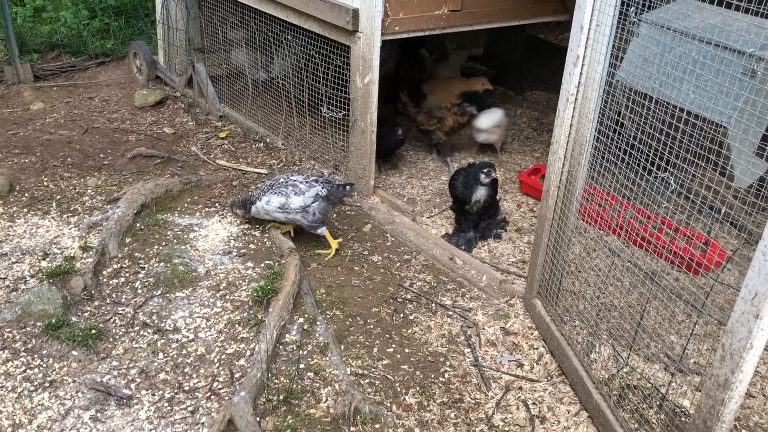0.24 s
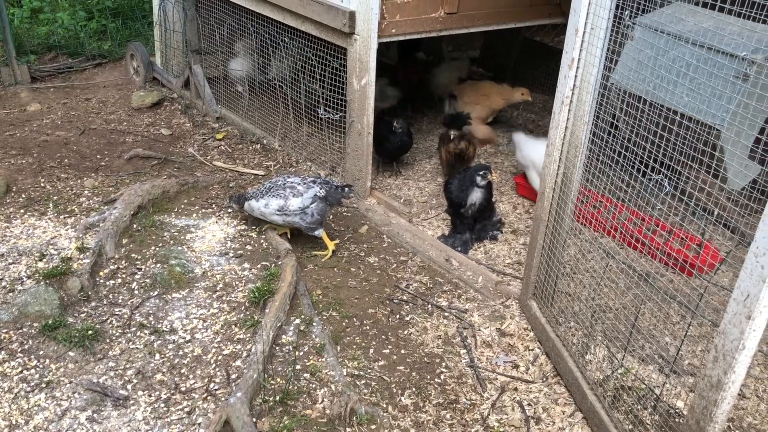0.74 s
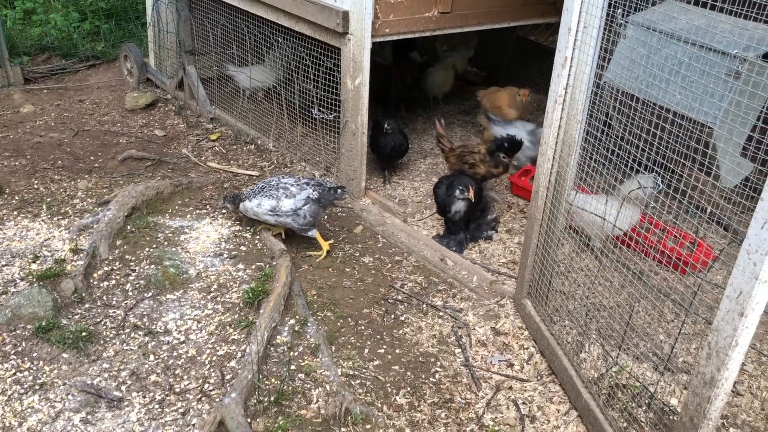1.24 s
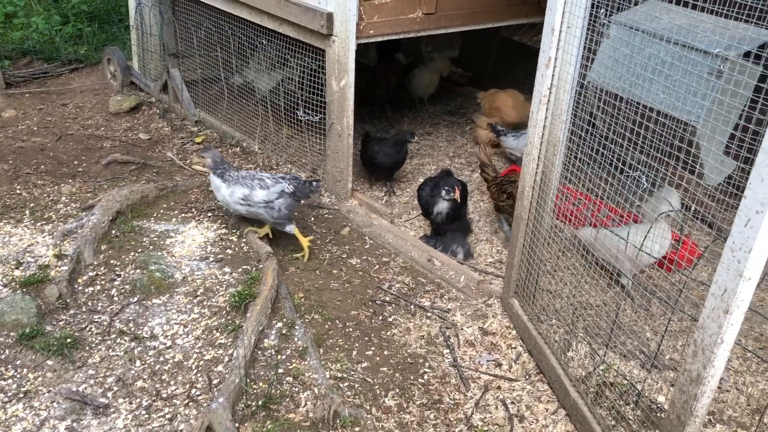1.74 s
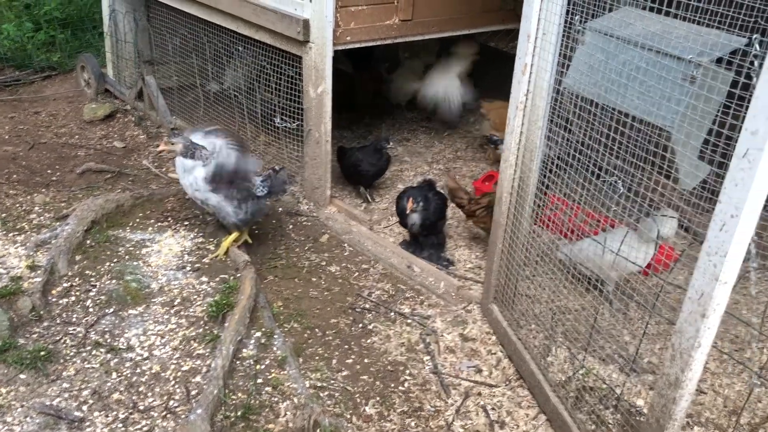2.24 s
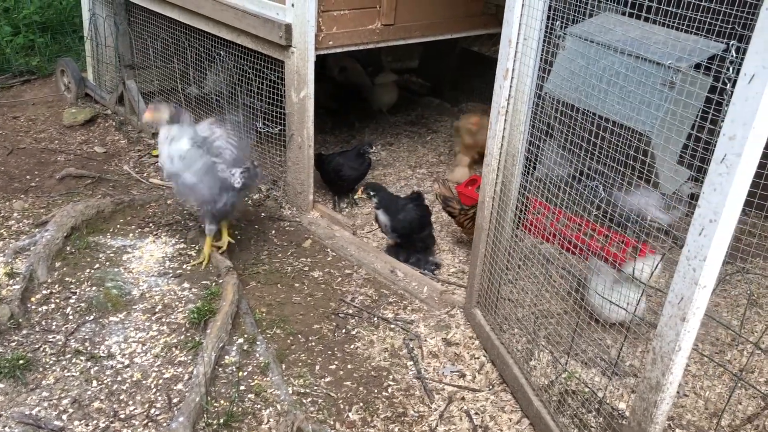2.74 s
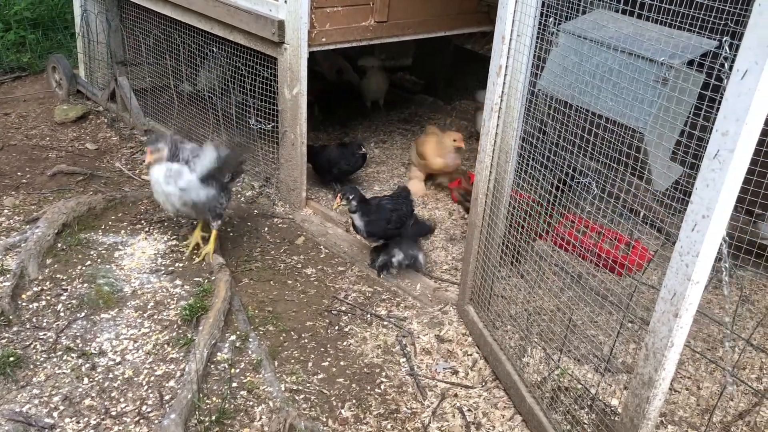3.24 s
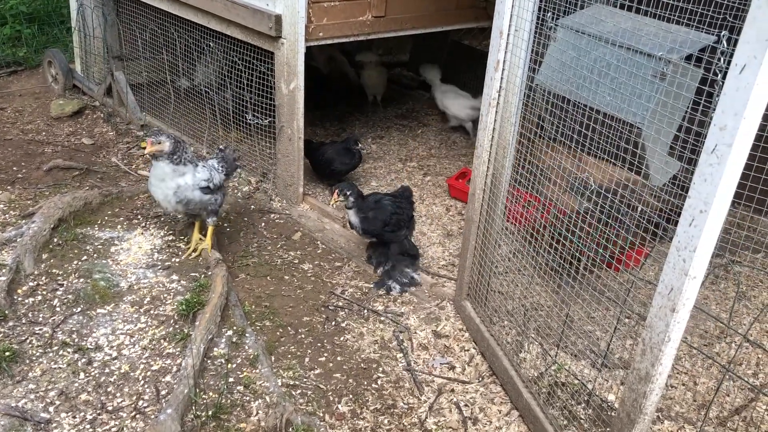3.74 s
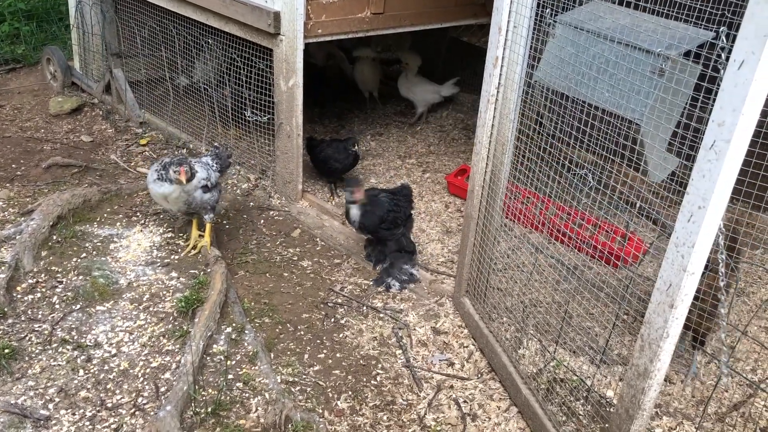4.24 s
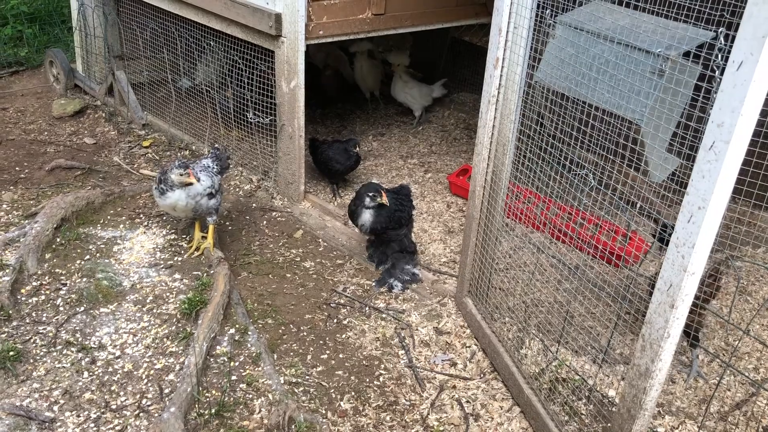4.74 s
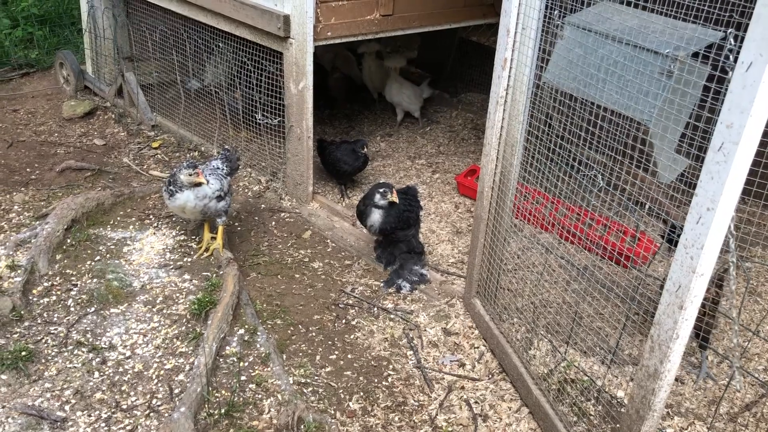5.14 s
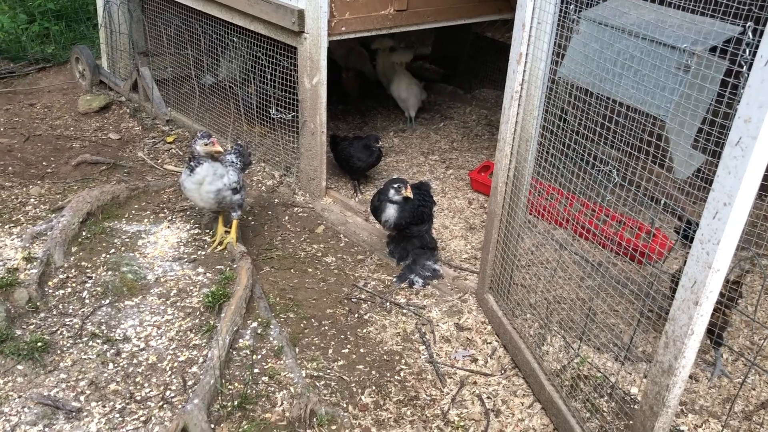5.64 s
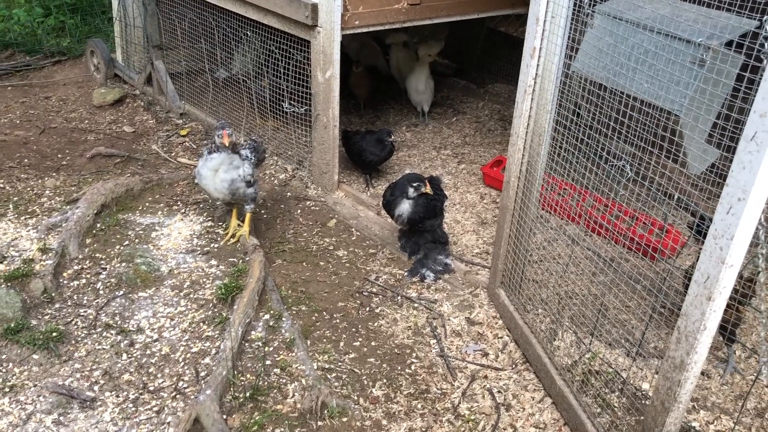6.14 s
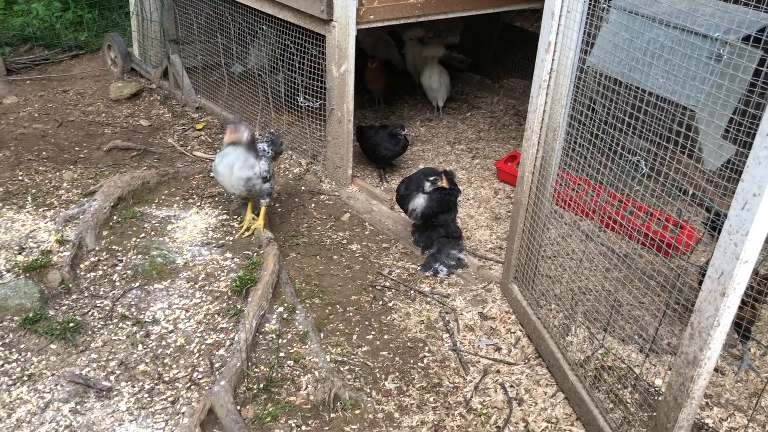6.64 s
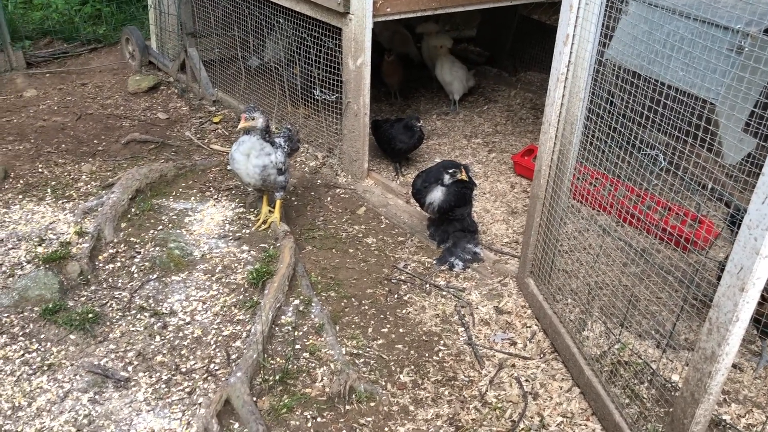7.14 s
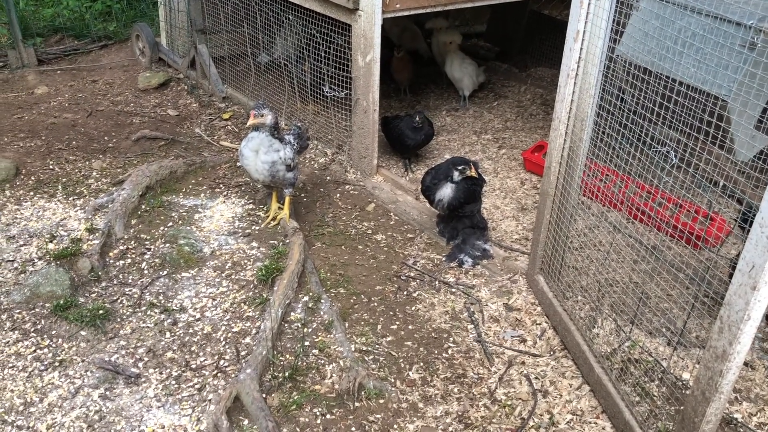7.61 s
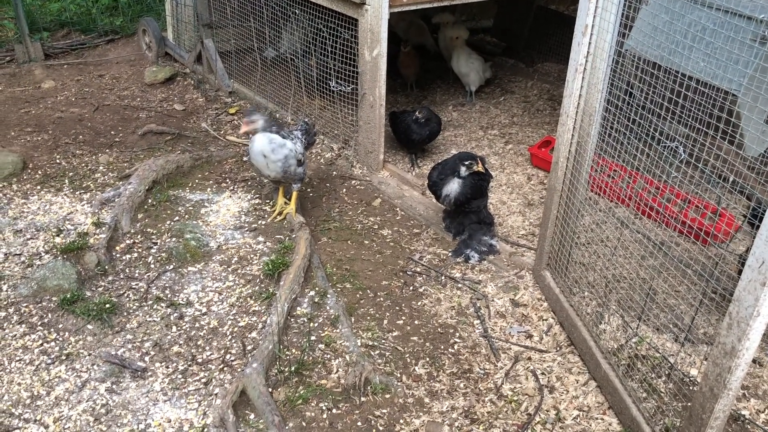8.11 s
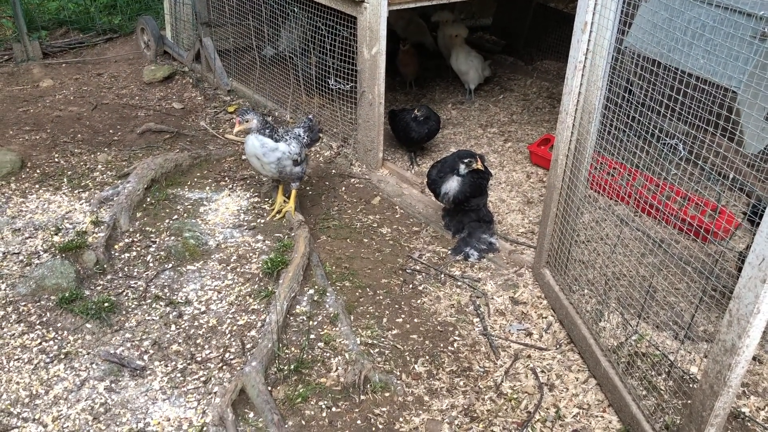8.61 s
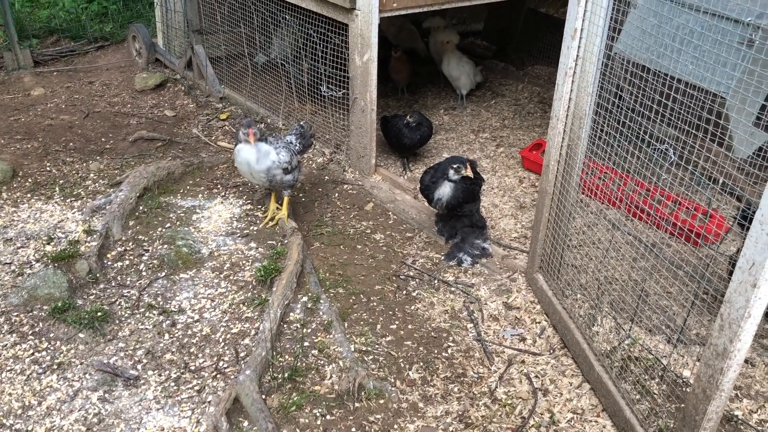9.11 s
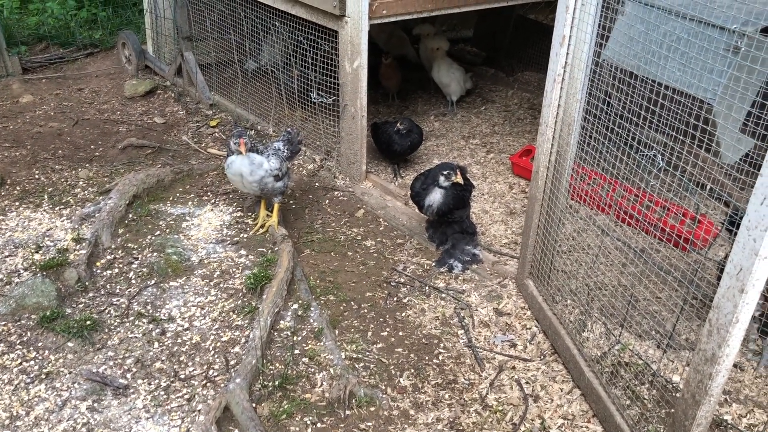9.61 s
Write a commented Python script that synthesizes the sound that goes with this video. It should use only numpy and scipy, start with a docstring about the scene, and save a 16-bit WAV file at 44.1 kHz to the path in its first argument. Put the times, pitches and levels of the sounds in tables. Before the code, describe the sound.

Outdoors beside a small wooden coop, a steady soft airy hush lies under bright chick peeps. They start in a rapid cluster, pause, then one bird hops with fluttering wings, a dry knock and a scrape through chips. Others scurry with light rustles and snaps while peeps grow busy and occasionally crack low. Later the peeping spaces out and softens. Mono microphone a short distance away, with faint wild bird calls.

```python
"""Peeps in quick runs are heard first, from young chickens at the open door of a wooden coop, over a soft hush.
Each peep is a frequency-modulated whistle that mostly scoops up and falls; rough ones flutter and beat.
Now and then a voice breaks down to a low, reedy note, a harmonic tone with lines at half its pitch.
One bird hops with a knock and a skid, made of filtered clicks and decaying board modes; wings are noise puffs.
Feet patter as the others scurry off; short echoes return from the coop and thin calls come from far wild birds."""
import sys
import numpy as np
from scipy import signal
from scipy.fft import rfft, irfft, next_fast_len
from scipy.io import wavfile
from scipy.ndimage import map_coordinates

SR = 44100
rng = np.random.default_rng(int(sys.argv[2]) if len(sys.argv) > 2 else 0)


def transcribe(u):
    """Save the signal u as a 16-bit wav file named by the first command-line argument.

    u: samples, shape (n,) or (channels, n), limited to [-1, 1]; the rate is SR.
    q: integer samples, one column per channel.
    """
    v = np.clip(np.atleast_2d(u).T, -1, 1)
    q = np.round(v * 32767).astype(np.int16)
    wavfile.write(sys.argv[1], SR, q)


N = 435265
T = np.arange(N) / SR

# spectrum of the outdoor hush: (frequency [Hz], density [dB/Hz])
AIR_SPECTRUM = [(15, -74), (25, -46), (75, -8), (129, -3), (227, -4.5), (289, -5.5), (340, -6), (410, -5.5),
                (523, -5), (997, -1.5), (3090, -10), (3340, -11), (15500, -43)]
# thin calls of wild birds far off: (time [s], length [s], pitch [Hz], level [dB])
FAR_CALLS = [(0.42, 0.17, 4800, -66.5), (2.661, 0.051, 5620, -58), (8.13, .15, 7020, -77),
             (9.655, 0.2, 3280, -63)]
# how busily the flock stirs the litter: (time [s], level [dB])
BUSTLE = [(0, -74), (1.1, -74.5), (1.4, -60.5), (1.8, -89), (2.2, -61), (2.8, -61.5), (3.3, -67.5),
          (4.4, -64), (4.8, -79.5), (9.87, -88)]
# spectrum of chips ground under a skidding foot: (frequency [Hz], density [dB/Hz])
SKID_SPECTRUM = [(59, -55), (100, -25), (184, -30), (209, -25), (281, -17), (614, -5.5), (727, -7),
                 (1040, -5), (1620, -5), (2320, -12.5), (2810, -11), (5400, -17.5), (15500, -40)]
# spectrum of rustling and snapping chips: (frequency [Hz], density [dB/Hz])
CHIP_SPECTRUM = [(500, -2), (1500, 8), (3500, -0.5), (6000, -3.5), (10000, -9.5), (15000, -14)]
# feet and beaks on the litter: (time [s], level [dB], 60 dB decay time [s])
STEPS = [(0.995, -54, 0.027), (2.365, -40.5, 0.056), (2.481, -38.5, 0.09), (2.488, -28, 0.068),
         (2.522, -36.5, 0.23), (2.831, -45, 0.053), (2.86, -46.5, 0.1), (2.937, -43, 0.087),
         (2.965, -41.5, 0.05), (3.047, -42.5, 0.055), (3.705, -50, 0.035), (3.785, -43, 0.036),
         (3.839, -47, 0.036), (3.873, -44.5, 0.054)]
# dry chips snapping underfoot: (time [s], level [dB], 60 dB decay time [s])
SNAPS = [(2.487, -24, 0.0067), (3.449, -41.5, 0.0072), (3.733, -36, 0.02), (4.03, -46.5, 0.026),
         (4.275, -48.5, 0.031), (4.338, -50, 0.018)]
# spectrum of a step's crunch: (frequency [Hz], density [dB/Hz])
KNOCK_SPECTRUM = [(59, -52), (100, -22), (508, -7), (1430, -6), (1690, -9), (2320, -11), (2810, -6.5),
                  (3610, -14), (4190, -14), (5510, -18), (15500, -34.5)]
# modes of the boards under the litter: (frequency [Hz], 60 dB decay time [s], level [dB])
BOARD_MODES = [(482, 0.11, 2.5), (950, .04, 3), (1273, 0.096, -4), (1736, 0.027, 0), (2770, .03, -8)]
# wing beats: (time [s], length [s], level [dB])
WING_BEATS = [(2.175, 0.058, -48), (2.353, 0.075, -48.5), (2.479, 0.03, -48), (2.68, 0.082, -49.5),
              (2.85, 0.051, -49), (2.935, 0.077, -49), (3.025, 0.094, -51.5), (3.21, 0.048, -55)]
# spectrum of a wing beat: (frequency [Hz], density [dB/Hz])
WING_SPECTRUM = [(25, -42), (45, -19), (80, -2), (170, -2.5), (370, 1), (700, -6.5), (1500, -7.5),
                 (5000, -28)]
# echoes off the ground, the door and the back of the coop: (delay [s], level [dB])
ECHOES = [(.0034, -14.5), (0.0111, -14.5), (.024, -24.5)]
# mostly arched peeps: (time [s], length [s], pitch at mid-call [Hz], fall [semitones], level [dB],
# roughness [0-1])
PEEPS = [(0.0, 0.026, 3300, 2.5, -48.5, 0.6), (0.022, 0.053, 3380, 7, -47, 0.2),
         (0.067, 0.057, 3280.0, 7.6, -45, 0.46), (0.146, 0.075, 3280, 6, -48.5, 0.4),
         (0.183, 0.06, 3320.0, 10, -54.5, 0.4), (0.23, 0.048, 3410, 5, -42, 0.38),
         (0.305, 0.021, 2770, 1.1, -52.5, 0.2), (0.409, 0.076, 3494, 3.5, -46.5, 0.37),
         (0.571, 0.066, 3780, 3.5, -43, 0.38), (0.638, 0.048, 2950, 8, -53.5, 0.5),
         (0.695, 0.06, 3910.0, 2.5, -40.5, 0.2), (0.846, 0.052, 3870.0, 3.5, -39.0, 0.17),
         (1.182, 0.082, 3110, 10.9, -52.5, 0.3), (1.267, 0.089, 3520, 6.5, -45.5, 0.47),
         (1.325, 0.052, 3610, 4, -53.5, 0.4), (1.38, 0.059, 3140, 8.5, -50.2, 0.16),
         (1.419, 0.047, 3560, 1.3, -45.5, 0.48), (2.121, 0.042, 2520, 8.5, -47, 0.7),
         (2.118, 0.051, 3700, -1, -50.5, 0.5), (2.25, 0.067, 3600, 4, -48, 0.5),
         (2.398, 0.068, 3480, 3.5, -47.5, 0.24), (2.881, 0.054, 3410, 9.5, -43, 0.4),
         (3.01, 0.042, 3060, 12, -40.5, 0.42), (3.149, 0.076, 3490, 6.5, -52, 0.5),
         (3.226, 0.081, 3310.0, 9.8, -48.5, 0.47), (3.503, 0.064, 3420.0, 3, -47, 0.2),
         (3.597, 0.033, 2725, 4, -42.5, 0.07), (3.687, 0.064, 3596, 4, -43.5, 0.26),
         (3.838, 0.074, 3520.0, 8.5, -49.5, 0.56), (3.896, 0.07, 3800, 5, -53.5, 0.2),
         (4.165, 0.039, 2933, 3.5, -40, 0.18), (4.605, 0.045, 3500.0, 6.4, -49, 0.6),
         (4.808, 0.041, 3370, 4, -44, 0.0), (5.035, 0.091, 3300, 7.5, -45, 0.3),
         (5.247, 0.06, 3590, 3.9, -49, 0.3), (5.526, 0.077, 3144, 7, -43.5, 0.2),
         (5.755, 0.052, 3370, 2.5, -51, 0.0), (5.896, 0.056, 3460.0, 4.9, -53, 0.3),
         (6.047, 0.041, 3420.0, 5.0, -60.5, 0.6), (6.172, 0.069, 2890.0, 7, -52.5, 0.36),
         (6.176, 0.061, 3610, 8.8, -52.5, 0.4), (6.33, 0.07, 3320, 8.0, -50, 0.65),
         (6.517, 0.043, 3480, 4.5, -59, 0.2), (6.674, 0.059, 3410, 4, -47.5, 0.3),
         (6.921, 0.076, 3134, 6.5, -49, 0.3), (6.964, 0.056, 3520.0, 5, -53.0, 0.2),
         (7.14, 0.062, 3700.0, 1.5, -52.5, 0.3), (7.338, 0.077, 3680, 3, -54.5, 0.53),
         (7.618, 0.07, 3060, 7.5, -50.2, 0.0), (7.798, 0.068, 3270, 8.5, -49.5, 0.0),
         (7.993, 0.077, 3300, 7.6, -49.2, 0.1)]
# mostly downward slurs without a scoop; one drifts slightly up: (time [s], length [s],
# pitch at mid-call [Hz], fall [semitones], level [dB], roughness [about 0-1])
SLURS = [(1.16, 0.025, 3540, 1, -58, 0.3), (1.879, 0.037, 2144, 7, -46, 0.6),
         (1.886, 0.058, 3020, 4.9, -47, 0.3), (2.047, 0.049, 3300.0, 2.5, -45, 0.2),
         (2.223, 0.032, 2716, 12, -39, 1.02), (3.063, 0.034, 3180, 4.5, -40.5, 0.5),
         (3.202, 0.095, 3050, 3.5, -45, 0.48), (3.384, 0.026, 2326, 0.9, -47.5, 0.06),
         (3.63, 0.071, 3760.0, -0.8, -54, 0.7), (3.734, 0.04, 2877, 2.5, -40, 0.3),
         (3.954, 0.045, 2710, 5, -39.5, 0.4), (4.514, 0.015, 2610, 1, -45.8, 0.1),
         (4.652, 0.051, 2920.0, 5, -45, 0.35), (4.813, 0.026, 2700, 3.5, -41.0, 0.1),
         (4.842, 0.038, 2870.0, 5, -46, 0.16), (5.289, 0.047, 2660.0, 3.5, -43, 0.2),
         (6.005, 0.032, 3650, 2, -57, 0.9), (6.468, 0.058, 2640.0, 5, -52, 0.4),
         (6.619, 0.052, 3200, 3.5, -52, 0.3), (6.845, 0.069, 3400, 1.9, -52, 0.4),
         (8.367, 0.092, 3650, 5.4, -55.5, 0.5), (8.432, 0.165, 3070, 2.2, -51.5, 0.14)]
# startled squeals that shoot up and straight down: (time [s], length [s], pitch at mid-call [Hz], level [dB])
SQUEALS = [(2.185, .054, 4750, -47), (2.353, 0.046, 4670, -44.5)]
# voice breaks: (time [s], length [s], settled pitch [Hz], level [dB], octave re fundamental [dB])
BREAKS = [(1.41, 0.034, 1588, -42.5, -6), (3.024, 0.021, 1520, -45.5, -3), (3.386, 0.035, 1522, -37, -6),
          (3.624, .013, 1478, -36.5, -19), (3.985, 0.029, 1585, -39, -14), (4.526, 0.032, 1552, -37.5, -7),
          (4.682, 0.024, 1744, -50, -9), (4.843, 0.026, 1585, -41, -6), (5.584, 0.026, 1666, -49, -1.5),
          (6.006, 0.03, 1737, -49, -5), (6.213, .031, 1512, -50.5, -4)]
# how strongly a whistle's overtones leave the beak: (frequency [Hz], gain [dB])
BEAK = [(4200, -1.5), (5300, -22), (6300, -22), (7600, -28.5), (9500, -39), (15000, -50)]
# resonance of the windpipe, which swells a whistle sliding through it: (frequency [Hz], gain [dB])
WINDPIPE = [(2500, -1.5), (2850, .5), (3200, -1.5), (3500, -2.5), (3850, -1), (4300, -7)]
# the beak and throat favour the middle harmonics of a broken voice: (frequency [Hz], gain [dB])
THROAT = [(700, -8.5), (2200, 4.5), (3800, -3.5), (5000, -9), (12000, -33)]
# overtones carry best from a beak that faces the listener: (time [s], overtone gain [dB])
FACING = [(.1, 2), (.7, 6), (1.2, 1), (4.3, 0), (5, -4), (6.7, 1), (8, -2.5)]
# pitch shapes: (scoop [semitones], how early the scoop is over [exponent], how late the fall comes [exponent])
PEEP_SHAPE = (1.61, 7.54, 2.6)
SLUR_SHAPE = (0, 1, .75)
SQUEAL_SHAPE = (11, 2.7, 3.2)

AIR_DB = -54.5
TOP_HZ = 15600
# a foot bites into the chips, pushes harder up to a peak and stops; loose chips settle after it
SKID_START_S, SKID_PEAK_S = 2.54, 2.597
SKID_DB, SETTLE_DB = -32.5, -45.5
SKID_RISE_DB_PER_S, SKID_STOP_DB_PER_S, SETTLE_DB_PER_S = 135, 304, 107
SQUEAL_FALL, SQUEAL_ROUGH = 14, .7  # semitones, roughness 0-1
ATTACK_SHARE, RELEASE_SHARE = .16, .25  # shares of a call's length in which it swells and dies away
# as a call gives out, a high pitch collapses to this one; the larger the exponent, the more abruptly
COLLAPSE_HZ, COLLAPSE_LATENESS = 2900, 20
OVERTONE_FADE_DB = 7  # overtones are this much weaker at the two ends of a call than at its middle
BREAK_OVERSHOOT = 0.118  # a break starts this share above the pitch on which it settles


def undb(db):
    """Logarithmic level: decibels become an amplitude ratio."""
    return 10 ** (np.asarray(db) / 20)


def unit(x):
    """Power normalization: scale to rms 1."""
    return x / np.sqrt(np.mean(x ** 2) + 1e-20)


def add(out, s, x):
    """Superposition: mix x into out from time s."""
    i = max(int(s * SR), 0)
    out[i:i + len(x)] += x[:max(len(out) - i, 0)]


def gain_at(hz, points):
    """Frequency response: interpolate decibels over log frequency and return the gain."""
    f, db = np.transpose(points)
    return undb(np.interp(np.log(np.maximum(hz, 1)), np.log(f), db))


def colour(x, points):
    """Linear filtering: multiply the spectrum of x by a response, then scale to rms 1."""
    n = next_fast_len(len(x))
    bins_hz = np.arange(n // 2 + 1) * SR / n
    filtered = irfft(rfft(x, n) * gain_at(bins_hz, points), n)
    return unit(filtered[:len(x)])


def wander(n, rate):
    """Band-limited random motion: smoothly join random values drawn rate times a second, spread near 1."""
    at = np.arange(n) * rate / SR
    values = rng.standard_normal(int(at[-1]) + 2)
    return map_coordinates(values, [at], order=2, mode="nearest")


def grains(n, rate, spread_db):
    """Shot noise: random clicks of uneven size, rate per second on average."""
    size = undb(spread_db * np.minimum(rng.exponential(size=n), 4))
    struck = rng.random(n) < rate / SR
    return struck * rng.standard_normal(n) * size


def fade(t, t60):
    """Exponential damping: a fall of 60 dB in t60 seconds."""
    return np.exp(-np.log(1000) * t / t60)


def air():
    """Broadband noise: a steady outdoor hush whose level barely swells."""
    level = undb(AIR_DB + wander(N, 2.545))
    return level * colour(rng.standard_normal(N), AIR_SPECTRUM)


def far_birds(blur_hz=450):
    """Random modulation: distance blurs each call's carrier into a narrow band."""
    out = np.zeros(N)
    for s, length, hz, db in FAR_CALLS:
        n = int(length * SR)
        blur = wander(n, blur_hz) + 1j * wander(n, blur_hz)
        call = np.real(blur * np.exp(2j * np.pi * hz * T[:n]))
        add(out, s, undb(db) * signal.windows.tukey(n, .6) * call)
    return out


def litter(bite_s=0.0088):
    """Granular friction: wood chips grind under the skidding foot and rustle in fits under the flock."""
    before = np.maximum(SKID_PEAK_S - T, 0)
    after = np.maximum(T - SKID_PEAK_S, 0)
    bite = np.clip((T - SKID_START_S) / bite_s, 0, 1)
    push = bite * undb(-SKID_RISE_DB_PER_S * before)
    stop = undb(SKID_DB - SKID_STOP_DB_PER_S * after)
    settle = undb(SETTLE_DB - SETTLE_DB_PER_S * after)
    skid = push * (stop + settle) * undb(1.3 * wander(N, 160))
    bustle_db = np.interp(T, *np.transpose(BUSTLE)) + 3 * wander(N, 35)
    grind = colour(grains(N, 9000, 0.91), SKID_SPECTRUM)
    rustle = colour(grains(N, 1500, 3.5), CHIP_SPECTRUM)
    return skid * grind + undb(bustle_db) * rustle


def feet(board_db=-9, lowest_hz=120):
    """Impact and modal decay: steps crunch the litter and briefly ring the boards; single chips snap."""
    out, t = np.zeros(N), T[:SR // 5]
    for s, db, t60 in STEPS:
        crunch = colour(grains(len(t), 14000, 1.1), KNOCK_SPECTRUM) * fade(t, t60)
        ring = sum(undb(mode_db) * np.sin(2 * np.pi * hz * t) * fade(t, ring_s)
                   for hz, ring_s, mode_db in BOARD_MODES)
        add(out, s, undb(db) * (crunch + undb(board_db) * ring))
    for s, db, t60 in SNAPS:
        snap = colour(rng.standard_normal(len(t)), CHIP_SPECTRUM) * fade(t, t60)
        add(out, s, undb(db) * snap)
    # steps and snaps carry little below about 120 Hz
    return signal.sosfilt(signal.butter(2, lowest_hz, "high", fs=SR, output="sos"), out)


def wings():
    """Turbulent flow: each beat pushes a soft, low puff of air, heard as windowed noise."""
    out = np.zeros(N)
    for s, length, db in WING_BEATS:
        n = int(length * SR)
        puff = colour(rng.standard_normal(n), WING_SPECTRUM)
        add(out, s, undb(db) * signal.windows.tukey(n, .7) * puff)
    return out


def voice_break(length, start_hz, end_hz, octave_db, half_db=-13, settle_s=0.0063, upper_db=-11,
                jitter=0.019):
    """Period doubling: in a low register strong and weak cycles alternate, adding lines at half the pitch."""
    n = int(length * SR)
    u = np.linspace(0, 1, n)
    glide = end_hz + (start_hz - end_hz) * np.exp(-np.arange(n) / SR / settle_s)
    hz = glide * (1 + jitter * wander(n, 666))
    phase = 2 * np.pi * np.cumsum(hz) / SR
    upper = sum(gain_at(k * end_hz, THROAT) * np.sin(k * phase) for k in range(3, 7))
    halves = sum(gain_at((k + .5) * end_hz, THROAT) * np.sin((k + .5) * phase) for k in range(6))
    halves = np.minimum(2 * u, 1) * halves
    octave = undb(octave_db) * (np.sin(2 * phase) + undb(upper_db) * upper)
    tone = np.sin(phase) + octave + undb(half_db) * halves
    return np.sqrt(2) * tone * signal.windows.tukey(n, .25) * (1 - u ** 3)


def peep(length, pitch_hz, fall, shape, rough, facing_db, flutter_hz=300, swing=0.12, jitter=0.0406,
         wobble_db=8, twin=1.0, rasp=0.61, attack_db=-7, tail_db=-11):
    """Frequency modulation and beating: a gliding whistle; if rough, the two sides of the syrinx part."""
    n = int(length * SR)
    u = np.linspace(0, 1, n)
    flutter_phase = 2 * np.pi * np.cumsum(flutter_hz * (1 + 0.225 * wander(n, 90))) / SR
    flutter = swing * rough ** 2 * np.sin(flutter_phase)

    # pitch: any scoop, then the fall, then a collapse at the end
    scoop, early, late = shape
    sag = scoop * (1 - u) ** early + fall * u ** late
    hz = pitch_hz * 2 ** ((sag[n // 2] - sag) / 12)
    hz = hz - np.maximum(hz - COLLAPSE_HZ, 0) * u ** COLLAPSE_LATENESS
    phase = 2 * np.pi * np.cumsum(hz * (1 + flutter + jitter * rough * wander(n, 201.0))) / SR

    envelope_db = np.interp(u, [0, ATTACK_SHARE, 1 - RELEASE_SHARE, 1], [attack_db, 0, 0, tail_db])
    envelope_db = envelope_db + wobble_db * min(rough, .5) * np.tanh(2 * wander(n, 139))
    bright = undb(facing_db - OVERTONE_FADE_DB * (2 * u - 1) ** 2 + 3.9 * wander(n, 58.5))
    overtones = sum(gain_at(k * hz, BEAK) * np.sin(k * phase) for k in range(2, 4))
    tone = np.sin(phase) + bright * overtones

    # the second side mostly sings a little below the first
    detune = rng.choice([-1, -1, 1]) * rng.uniform(.05, .13)
    second = twin * rough ** 1.3 * np.sin(np.pi * u) * np.sin((1 + detune) * phase)
    # noise on both quadratures of the carrier makes the rasp
    hoarse = wander(n, 1600) * np.cos(phase) + wander(n, 1604) * np.sin(phase)
    voice = tone + second + rasp * rough ** 2 * hoarse
    return unit(undb(envelope_db) * gain_at(hz, WINDPIPE) * signal.windows.tukey(n, .08) * voice)


def flock():
    """Superposed voices: peeps, slurs and squeals share one whistle with three pitch shapes; breaks join them."""
    out = np.zeros(N)
    facing = lambda s: np.interp(s, *np.transpose(FACING))
    for calls, shape in ((PEEPS, PEEP_SHAPE), (SLURS, SLUR_SHAPE)):
        for s, length, hz, fall, db, rough in calls:
            add(out, s, undb(db) * peep(length, hz, fall, shape, rough, facing(s)))
    for s, length, hz, db in SQUEALS:
        squeal = peep(length, hz, SQUEAL_FALL, SQUEAL_SHAPE, SQUEAL_ROUGH, facing(s))
        add(out, s, undb(db) * squeal)
    for s, length, hz, db, octave_db in BREAKS:
        add(out, s, undb(db) * voice_break(length, hz * (1 + BREAK_OVERSHOOT), hz, octave_db))
    return out


def coop(x, wet_db=-18, t60=0.085, far_db=-29, far_t60=0.71):
    """Reflection as convolution: clear echoes and short scatter from ground and boards, a faint yard tail."""
    t = T[:SR // 2]
    near = grains(len(t), 1500, 2.8) * fade(t, t60) * (t > .002)
    far = rng.standard_normal(len(t)) * fade(t, far_t60) * (t > .02)
    # dividing by the root of the length gives each tail unit energy before its gain
    echo = (undb(wet_db) * unit(near) + undb(far_db) * unit(far)) / np.sqrt(len(t))
    for delay, db in ECHOES:
        add(echo, delay, undb([db]))
    return x + signal.fftconvolve(x, echo)[:N]


def scene():
    """Superposition: the birds with the coop's echoes, and the open air and far calls without them."""
    at_coop = litter() + feet() + wings() + flock()
    return (air() + far_birds() + coop(at_coop))[None]


def record(dry):
    """Low-pass filtering: a steep elliptic filter cuts the top of the spectrum."""
    return signal.sosfilt(signal.ellip(10, .1, 80, TOP_HZ, fs=SR, output="sos"), dry)


dry = scene()
out = record(dry)
transcribe(out)
```